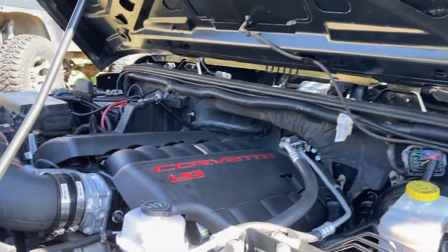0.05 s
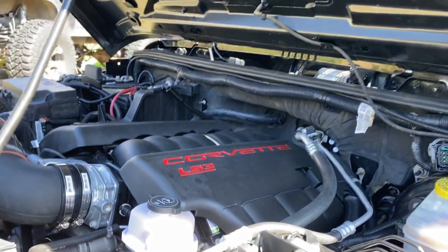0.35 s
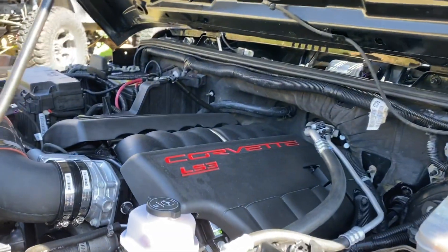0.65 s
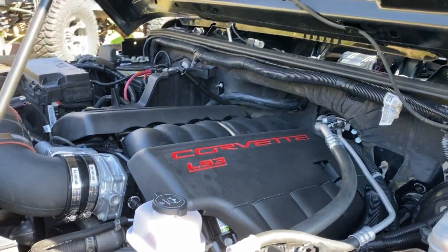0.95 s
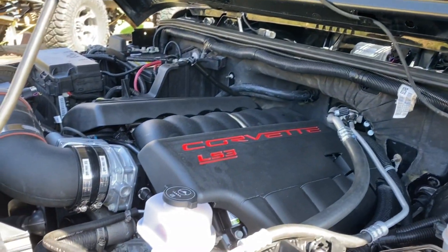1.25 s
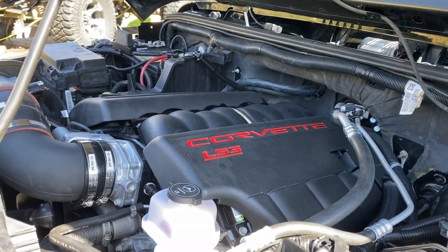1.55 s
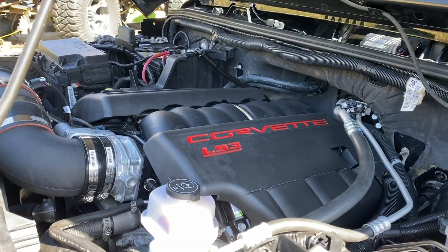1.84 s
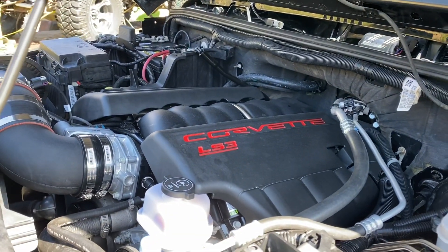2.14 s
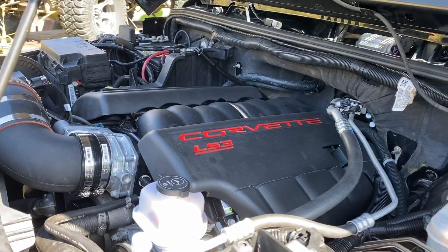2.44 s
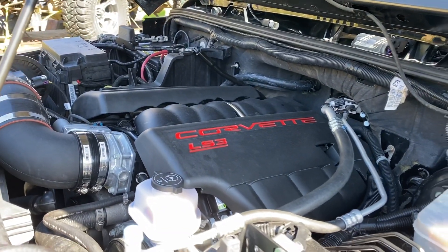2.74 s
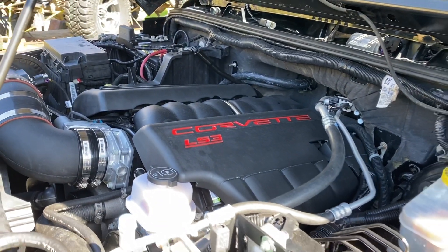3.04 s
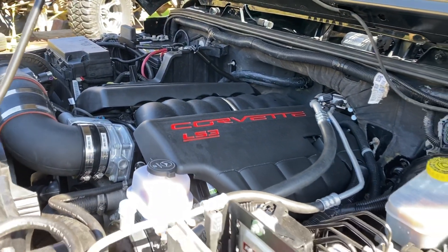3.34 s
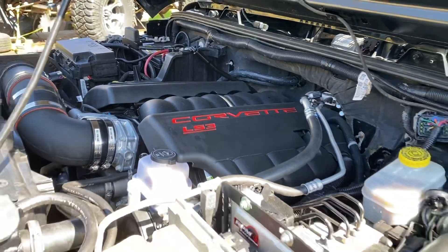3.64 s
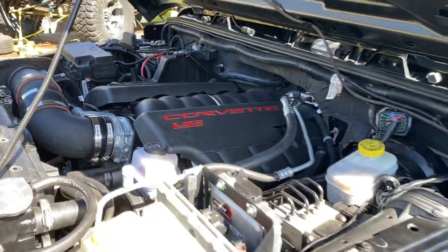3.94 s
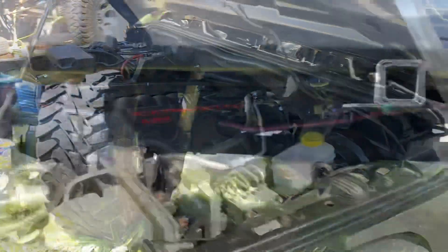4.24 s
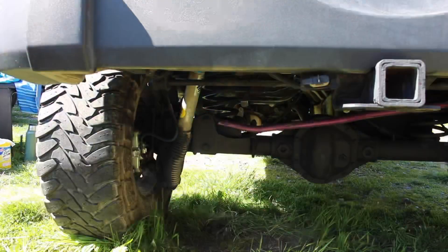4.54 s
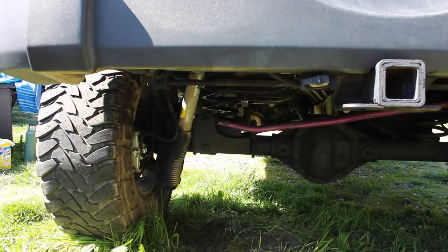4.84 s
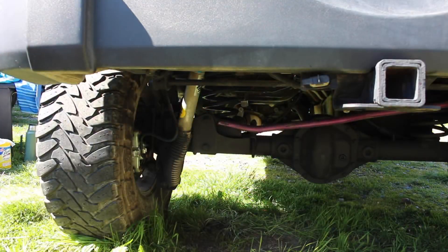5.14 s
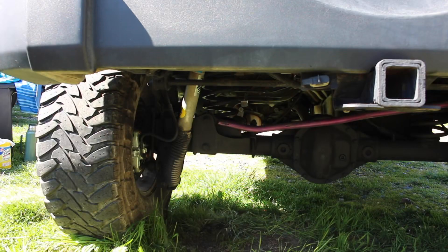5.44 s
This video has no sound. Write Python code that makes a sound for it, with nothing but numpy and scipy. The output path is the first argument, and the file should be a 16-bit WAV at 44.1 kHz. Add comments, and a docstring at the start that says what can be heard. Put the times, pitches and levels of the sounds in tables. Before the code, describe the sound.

Close above an open engine bay, a V8 throbs at idle with ticking valves and a hissing belt. It revs lightly once, the intake droning, then gradually winds down. A sharp click cuts to a spot near the tailpipe: low, raspy, ringing exhaust puffs with muffled clatter underneath. The idle recovers from a brief dip and picks up with another touch of throttle.

```python
"""A cross-plane V8 idles with a lope, the beat of its unequal firing pulses, which evens out under throttle
and softens on the overrun. Over the open engine bay a touch of throttle lifts it and it sinks back: the
intake drones and barks, valve gear clatters, panels sing as the speed passes their pitch, and the belt
drive hisses and whines. With a click the scene changes to behind the tailpipe, where gas rasps and rings
over dull machinery as the engine recovers from a dip and is lifted again."""
import sys
import numpy as np
from scipy import signal
from scipy.fft import rfft, irfft
from scipy.io import wavfile
from scipy.ndimage import uniform_filter1d

SR = 44100
rng = np.random.default_rng(int(sys.argv[2]) if len(sys.argv) > 2 else 0)


def transcribe(u):
    """Save the signal u as a 16-bit wav file named by the first command-line argument.

    u: samples, shape (n,) or (channels, n), limited to [-1, 1]; the rate is SR.
    q: integer samples, one column per channel.
    """
    v = np.clip(np.atleast_2d(u).T, -1, 1)
    q = np.round(v * 32767).astype(np.int16)
    wavfile.write(sys.argv[1], SR, q)


N = 250929
TIME = np.arange(N) / SR
FREQ = np.maximum(np.arange(N // 2 + 1) * SR / N, 1)
CYLINDERS, MAX_CYCLES = 8, 160

# Exhaust pulses in firing order: (relative strength [dB])
FIRING_PULSES = [-1.2, -.6, -.9, .1, -.5, -1.9, -.6, 2.2]
def exhaust(cycles, orders, loads, pipe, phase, dispersion, waver_db):
    """Fourier series: periodic firing gives orders, harmonics of the cycle rate, weighted by the pipes."""
    pattern = np.fft.fft(undb(FIRING_PULSES))
    cycle_hz = np.gradient(cycles) * SR
    pipe_gain = shape(pipe)
    note = 0
    for order, idle_db, *load_db in orders:
        k = round(order)
        lead = np.angle(pattern[k % CYLINDERS])  # strong and weak cylinders set each order's phase
        # the pipes delay the higher orders, which rounds off each pulse
        wave = np.cos(2 * np.pi * k * cycles + lead + phase - dispersion * k ** 2)
        db = idle_db + np.dot(load_db, loads) + waver_db * np.sqrt(k / CYLINDERS) * walk(14)
        note = note + np.sqrt(2) * undb(db) * np.interp(k * cycle_hz, FREQ, pipe_gain) * wave
    return note


def rumble(cycles, spectrum):
    """Cyclic variation: no two burns are equal, and their random part excites the pipes as low noise."""
    sizes = rng.standard_normal((MAX_CYCLES, CYLINDERS))
    burns = impulses(cycles, np.arange(CYLINDERS) / CYLINDERS, sizes, late_s=0)
    return unit(colour(burns, shape(spectrum)))


# Exhaust harmonics: (order [per cycle], idle level [dB], gain [dB/throttle], gain [dB/overrun])
BAY_HARMONICS = [(3.0, -18.5, -15, -4), (4.0, -47, -1, 10), (5.0, -26, -1, -13.5), (6.0, -25.5, -8.5, -11),
                 (7.0, -55, 29.5, -13), (8.0, -22.5, 6.5, -12), (9.0, -37, 12, 2), (10.0, -30.5, -1.5, -26),
                 (11.0, -25, -3.5, -17.5), (12.0, -38.5, 7, -5), (13.0, -30, -3, -14.5),
                 (16.0, -27.5, -9, -18)]
# Response of pipes and muffler: (frequency [Hz], gain [dB])
BAY_PIPE_GAIN = [(42.0, -7), (51.0, -1.5), (62.0, 7), (85.0, 0.5), (103.0, 8), (118.0, 13), (142.0, -1),
                 (160.0, -4), (180.0, -8.5), (210.0, 5), (245.0, -7.5), (290.0, 3), (335.0, -4.5),
                 (360.0, 2), (420.0, -7)]
# Rumble of unequal burns: (frequency [Hz], gain [dB])
BAY_RUMBLE = [(20, -36), (36, -29), (50, 0), (75, 9), (120, 3), (170, -47), (260, -36), (500, -48)]
def bay_lope(cycles, throttle, overrun):
    """Superposition: the exhaust's periodic note and random rumble add beneath the bay."""
    note = exhaust(cycles - .206, BAY_HARMONICS, [throttle, overrun], BAY_PIPE_GAIN,  # lag in the pipes
                   phase=.61, dispersion=.664, waver_db=.85)
    return note + undb(-25 - 2 * throttle - 6.5 * overrun) * rumble(cycles, BAY_RUMBLE)


# Exhaust harmonics: (order [per cycle], idle level [dB], gain [dB/load])
REAR_HARMONICS = [(3.0, -29.5, -5), (4.0, -27.5, -15), (5.0, -29.5, 3), (6.0, -22, -3), (7.0, -59, 20),
                  (8.0, -19, 8), (9.0, -51, -1), (10.0, -37, -8), (11.0, -24.5, -3.5), (13.0, -28, 2.5),
                  (15.0, -34.5, -2), (16.0, -34.5, 6), (19.0, -37.5, 5), (21.0, -31, -1), (24.0, -54, 5),
                  (27.0, -45.5, 6), (44.0, -42, -1)]
# Response of pipes and muffler: (frequency [Hz], gain [dB])
REAR_PIPE_GAIN = [(40.0, -17), (51.0, 7.5), (65.0, -6), (105.0, 1), (140.0, 2.5), (165.0, -5), (205.0, 0),
                  (280.0, -5.5), (400.0, -10.5), (450.0, -1), (495.0, 4.5), (550.0, 0.5), (650.0, -18),
                  (748, -10.5), (830, -22)]
# Rumble of unequal burns: (frequency [Hz], gain [dB])
OUTLET_RUMBLE = [(20, -41), (38, -32), (55, -14), (80, 6), (125, 19), (170, 11.5), (260, -21), (500, -51)]
def rear_lope(cycles, load):
    """Radiation from an open pipe: the exhaust's note and rumble, close to the outlet."""
    note = exhaust(cycles - .052, REAR_HARMONICS, [load], REAR_PIPE_GAIN,  # lag in the pipes
                   phase=.76, dispersion=.136, waver_db=.5)
    return note + undb(-26) * rumble(cycles, OUTLET_RUMBLE)


# Spectrum of the rasp: (frequency [Hz], gain [dB])
RASP_SPECTRUM = [(25, -40), (70, -9), (150, -5), (220, 2), (270, -1), (340, 1), (405, -7.5), (492, 0.5),
                 (545, -4.5), (590, -1), (650, -22), (760, -12), (880, -19), (2000, -45.5)]
def tailpipe_rasp(cycles, load, cycle_hz):
    """Source and filter: bursts of gas, stronger with load and speed, are coloured by the tailpipe."""
    idle_hz = 17
    gas = impact_train(cycles, jitter_s=.00012, scatter_db=.5, throb_db=2.2, t60=.033)
    db = -28.5 + 3 * load + 5 * np.log2(cycle_hz / idle_hz)
    return undb(db) * unit(colour(gas, shape(RASP_SPECTRUM)))


# Strong puffs: (position [cycles], frequency [Hz], t60 [s], relative level [dB])
PUFF_MODES = [(0.96, 494, 0.14, -1.5), (.58, 495, .08, -7), (.1, 748, .2, -14)]
def tailpipe_puffs(cycles, load):
    """Shock excitation: strong puffs ring the pipe, and fade as load evens out the firings."""
    return undb(-32 - 11 * load) * ring(cycles, PUFF_MODES, scatter_db=.3, jitter_s=.00012, rise_s=.0033)


def intake_drone(cycles, throttle):
    """Forced resonance: suction strokes drive the duct, whose peak grows and broadens with throttle."""
    duct_hz, half_width_hz = 156.5, 5.7 + 24 * throttle ** 2
    strokes = CYLINDERS * (cycles - .039)
    response = resonance(np.gradient(strokes) * SR, duct_hz, 2 * half_width_hz)
    db = -26 + 1.5 * throttle + .7 * walk(12)
    return np.sqrt(2) * undb(db) * response * np.cos(2 * np.pi * strokes)


# Spectrum of the bark: (frequency [Hz], gain [dB])
BARK_SPECTRUM = [(90, -30), (170, -5), (230, 2), (350, -2), (410, -8), (470, 11.5), (540, 7), (640, -5),
                 (800, -11), (1000, -9), (1200, -6), (1700, -22), (4000, -40)]
def intake_bark(cycles, load):
    """Modulated flow noise: air tears past the open throttle in one gulp for each cylinder."""
    gulps = undb(5.5 * np.cos(2 * np.pi * CYLINDERS * cycles) + .5 * walk(130))
    air = unit(colour(gulps * rng.standard_normal(N), shape(BARK_SPECTRUM)))
    return undb(-22.5 + 17 * (load - 1)) * air


# Response of the casings: (frequency [Hz], gain [dB])
CASING_GAIN = [(40, -9.5), (150, 6.5), (260, -5.5), (315, -5), (410, -7.5), (620, -2.5), (780, 0),
               (900, -1.5), (1080, -1), (1550, -6.5), (1950, -4), (2350, -5.5), (2700, -8.5), (3200, -8.5),
               (4600, -12.5), (6500, -19), (15000, -28)]
# Their resonances: (frequency [Hz], width [Hz], gain [dB])
CASING_MODES = [(480, 76, 5.1), (810, 90, 2.8), (1196, 74, 4.2), (1385, 24, 3.6), (1855, 72, 2),
                (2230, 49, 1.8), (2920, 100, 2), (5300, 230, 4.5)]
# Scattering by the bay's walls into the side signal: (frequency [Hz], gain [dB])
WALL_GAIN = [(50, -2.5), (250, -2.5), (500, -6.5), (1000, -6.5), (2000, -3.5), (3000, 0), (4500, -3.5),
             (6000, -3.5), (12000, 4.5)]
def valve_clatter(cycles):
    """Structure-borne sound: valves, lifters and pistons ring the casings. Returns direct and scattered."""
    casings = shape(CASING_GAIN, CASING_MODES)
    strikes = impact_train(cycles, jitter_s=.0001, scatter_db=3, throb_db=-1.2, t60=.029)
    direct = radiate(strikes, casings, noise_db=-6)
    side_strikes = impact_train(cycles, jitter_s=.0001, scatter_db=.5, throb_db=-2.5, t60=.057)
    sideways = radiate(side_strikes, casings, noise_db=-6.5)
    return direct, colour(sideways, shape(WALL_GAIN))


# Panels and pipes: (order [per cycle], resonance [Hz], width [Hz], relative level [dB])
PANEL_MODES = [(10, 200, 18, -16), (11, 201, 14, -7), (12, 285, 56, -10), (18, 365, 36, -16),
               (19, 356, 36, -12), (20, 360, 30, -12), (19, 465, 40, -18), (27, 605, 70, -14),
               (30, 730, 70, -12), (32, 755, 130, -13), (33, 610, 60, -15), (41, 820, 120, -16),
               (44, 900, 160, -17), (51, 945, 90, -15), (48, 1172, 90, -16), (59, 1190, 80, -17),
               (55, 1230, 90, -17), (75, 1275, 50, -18), (74, 1807, 60, -20), (106, 1803, 70, -22),
               (102, 1905, 120, -16), (132, 2245, 120, -13), (137, 2330, 90, -17), (57, 1385, 60, -20),
               (124, 2560, 200, -21), (132, 3190, 90, -22), (220, 3735, 280, -18), (311, 5265, 200, -27)]
def singing_panels(cycles):
    """Forced resonance: a part sings while an order of teeth, vanes or strokes meets its frequency."""
    cycle_hz = np.gradient(cycles) * SR
    out = 0
    for order, centre_hz, width_hz, db in PANEL_MODES:
        response = resonance(order * cycle_hz, centre_hz, width_hz)
        wave = np.sin(2 * np.pi * (order * cycles + rng.random()) + .03 * np.sqrt(order) * walk(30))
        out = out + np.sqrt(2) * undb(db + 2 * walk(29.83)) * response * wave
    return out


# Knocks and tappet ticks: (position [cycles], frequency [Hz], t60 [s], relative level [dB])
TAPPET_MODES = [(.34, 812, 0.13, 4.5), (.22, 870, .08, -10), (0.1, 2500, 0.05, -13)]
# Their envelope: (time [s], level [dB])
TAPPET_LEVEL = [(0, -42), (.25, -35), (.42, -31.5), (.78, -32), (.95, -42), (1.2, -50), (2.5, -50),
                (4.3, -60)]
def tappet_knocks(cycles):
    """Impact excitation: knocks recur in every cycle, plainest at a slack idle."""
    knocks = ring(cycles, TAPPET_MODES, scatter_db=0, jitter_s=.00008, rise_s=.0032)
    return undb(curves(TAPPET_LEVEL)[0]) * knocks


# Machinery through the floor: (frequency [Hz], gain [dB])
FLOOR_GAIN = [(30, -16), (400, 3.5), (900, -4.5), (1050, 1.5), (1130, 5.5), (1190, 0), (1255, 3),
              (1500, -2), (1800, 0), (2150, -2), (2600, -5.5), (4000, -13.5), (5600, -17.5), (6500, -22.5),
              (8500, -21.5), (10200, -30.5), (12800, -34), (15700, -44)]
# Its tick: (position [cycles], frequency [Hz], t60 [s], relative level [dB])
FLOOR_TICK = [(.52, 2150, .012, -17)]
def underfloor_clatter(cycles):
    """Transmission loss: clatter arrives dulled from under the floor, with one faint tick a cycle."""
    strikes = impact_train(cycles, jitter_s=.00006, scatter_db=1, throb_db=.2, t60=.035)
    clatter = radiate(strikes, shape(FLOOR_GAIN), noise_db=-8)
    return clatter + ring(cycles, FLOOR_TICK, scatter_db=4, jitter_s=.00023, rise_s=.00025)


# Spectrum of the hiss: (frequency [Hz], gain [dB])
HISS_SPECTRUM = [(1500, -37), (4000, -19), (6200, 2.5), (7500, -2), (10000, 7.5), (12000, -4), (14000, 8),
                 (15700, -8.5)]
def belt_hiss(ticks):
    """Interaural delay: the belt drive's hiss reaches the left ear later, so it lies to the right."""
    delay_s = .000283
    right = radiate(ticks, shape(HISS_SPECTRUM), noise_db=2)
    left = colour(right, np.exp(-2j * np.pi * FREQ * delay_s))
    return np.array([left, right])


# Response of the intake box: (frequency [Hz], gain [dB])
AIRBOX_GAIN = [(200, -37), (310, -14.5), (355, -1), (400, -11.5), (600, -53)]
# Envelope of its boom: (time [s], level [dB])
BOOM_LEVEL = [(0, -39), (1.2, -35), (1.7, -38), (2.6, -51), (2.95, -46), (3.7, -44), (4.3, -45)]
def airbox_boom(ticks):
    """Cavity resonance: the intake box booms at one pitch whatever the engine speed."""
    return undb(curves(BOOM_LEVEL)[0]) * radiate(ticks, shape(AIRBOX_GAIN), noise_db=-3)


# Rotor harmonics: (time [s], sixth [dB], seventh [dB], eighth [dB])
ROTOR_LEVELS = [(1.3, -60, -60, -60), (1.5, -43.5, -56, -58), (1.75, -43.5, -56, -58), (1.9, -54, -58, -60),
                (2.25, -45, -44, -50), (2.42, -55, -47, -53), (2.52, -58, -46, -41), (2.65, -53, -54, -50),
                (2.78, -44, -56, -45), (2.89, -53, -48, -47), (2.99, -60, -52, -38),
                (3.16, -60, -54, -44.5), (3.3, -58, -56, -41.5), (3.42, -50, -60, -53),
                (3.6, -45, -62, -64), (3.9, -60, -66, -68)]
def rotor_whine(cycles):
    """Phase modulation: three harmonics of a belt-driven rotor flutter as the belt creeps."""
    turns = 24.8 * cycles
    out = 0
    for k, db in zip((6, 7, 8), curves(ROTOR_LEVELS)):
        amplitude = np.sqrt(2) * undb(db + 2.2 * walk(45))
        out = out + amplitude * np.sin(2 * np.pi * k * turns + .45 * walk(58))
    return out


def impact_train(cycles, jitter_s, scatter_db, throb_db, t60, count=96):
    """Quasi-periodic excitation: blows recur nearly alike each cycle, spread by dense reflections."""
    positions = (np.arange(count) + rng.random(count)) / count
    strengths = rng.choice([-1, 1], count) * undb(2 * rng.standard_normal(count))
    throb = undb(throb_db * (np.cos(2 * np.pi * 3 * positions) + np.sin(2 * np.pi * 2 * positions)))
    scatter, jitter = rng.standard_normal((2, MAX_CYCLES, count))
    sizes = strengths * throb * undb(scatter_db * scatter)
    hits = unit(impulses(cycles, positions, sizes, jitter_s * jitter))
    echoes = rfft(rng.standard_normal(N) * np.exp(-np.log(1000) * TIME / t60))
    return colour(hits, np.exp(1j * np.angle(echoes)))  # all-pass: spreads without colouring


def ring(cycles, modes, scatter_db, jitter_s, rise_s):
    """Damped free vibration: each mode is struck once a cycle and decays exponentially."""
    out = 0
    for position, hz, t60, db in modes:
        scatter, jitter = rng.standard_normal((2, MAX_CYCLES, 1))
        hits = impulses(cycles, position, undb(scatter_db * scatter), jitter_s * jitter)
        envelope = np.exp(-np.log(1000) * TIME / t60) * (1 - np.exp(-TIME / rise_s))
        response = envelope * np.sin(2 * np.pi * hz * TIME)
        out = out + undb(db) * unit(colour(hits, rfft(response)))
    return out


def impulses(cycles, positions, sizes, late_s):
    """Impulse train locked to positions in the cycle; sizes has one row per cycle."""
    when = np.interp(np.arange(len(sizes))[:, None] + positions, cycles, TIME, left=-1, right=-1)
    at = np.round((when + late_s) * SR).astype(int)
    inside = (at >= 0) & (at < N)
    return np.bincount(at[inside], sizes[inside], N)


def radiate(hits, gain, noise_db):
    """Source and filter: blows plus white noise, coloured and scaled to rms 1."""
    return unit(colour(hits + undb(noise_db) * rng.standard_normal(N), gain))


def resonance(hz, centre_hz, width_hz):
    """Lorentzian peak of height 1, with its full width at half height."""
    return 1 / (1 + (2 * (hz - centre_hz) / width_hz) ** 2)


def shape(points, modes=()):
    """Frequency response from (frequency [Hz], gain [dB]) points and resonance peaks."""
    hz, db = np.transpose(points)
    peaks_db = sum(peak_db * resonance(FREQ, centre, width) for centre, width, peak_db in modes)
    return undb(np.interp(np.log(FREQ), np.log(hz), db) + peaks_db)


def colour(x, gain):
    """Filtering as multiplication of the spectrum."""
    return irfft(rfft(x) * gain, N)


def walk(rate_hz):
    """Low-pass noise: random steps, smoothed twice."""
    hold = int(SR / rate_hz)
    steps = np.repeat(rng.standard_normal(N // hold + 1), hold)
    return unit(uniform_filter1d(uniform_filter1d(steps, hold), hold)[:N])


def curves(table):
    """Linear interpolation of each column in time."""
    times, *columns = np.transpose(table)
    return [np.interp(TIME, times, column) for column in columns]


def undb(db):
    """Decibels to amplitude ratio."""
    return 10 ** (np.asarray(db) / 20)


def unit(x):
    """Normalisation to rms 1."""
    return x / np.sqrt(np.mean(x ** 2))


# Engine speed: (time [s], four-stroke cycle rate [Hz])
BAY_RATE = [(0, 14.32), (0.23, 16.19), (0.52, 17.03), (0.98, 16.73), (1.14, 18.03), (1.33, 22.99),
            (1.47, 24.37), (1.7, 24.44), (2.2, 23.59), (2.85, 20.99), (3.5, 19.22), (4.3, 17.3)]
# Engine load: (time [s], load [1 on throttle, 0 idling, -1 on the overrun])
BAY_ENGINE_LOAD = [(0.0, 0.2), (0.25, 0.018), (1.0, 0.17), (1.18, 0.79), (1.33, 0.91), (1.6, -0.47),
                   (2.2, -0.88), (2.9, -1.05), (3.4, -1.35), (4.3, -0.61)]
# Envelope of the machinery: (time [s], level [dB])
BAY_MACHINERY = [(0, -23), (.3, -21), (1, -21), (1.2, -19), (1.6, -18.5), (1.8, -22), (2.7, -23.5),
                 (3.6, -27), (4.3, -30)]
def engine_bay():
    """Superposition over the bay: one crankshaft times every source; wall scatter gives stereo width."""
    cycles = .1375 + np.cumsum(curves(BAY_RATE)[0]) / SR
    load, machinery_db = curves(BAY_ENGINE_LOAD)[0], curves(BAY_MACHINERY)[0]
    throttle, overrun = np.maximum(load, 0), np.maximum(-load, 0)
    lope = bay_lope(cycles, throttle, overrun)
    direct, side = valve_clatter(cycles)
    mid = direct + singing_panels(cycles)
    metal = undb(machinery_db) * np.array([undb(.64) * (mid + side), undb(-.64) * (mid - side)])
    ticks = impact_train(cycles, jitter_s=.0003, scatter_db=6, throb_db=1.5, t60=.036)
    belt = undb(machinery_db - 11.5) * belt_hiss(ticks) + rotor_whine(cycles)
    knocks = tappet_knocks(cycles)
    intake = airbox_boom(ticks) + intake_drone(cycles, throttle) + intake_bark(cycles, load)
    return lope + intake + metal + knocks + belt


# Engine speed: (time [s], four-stroke cycle rate [Hz])
REAR_RATE = [(4.3, 13.14), (4.48, 15.54), (4.88, 17.12), (5.36, 16.72), (5.51, 18.65), (5.69, 22.8)]
# Engine load: (time [s], load [1 on throttle, 0 idling])
REAR_ENGINE_LOAD = [(4.3, 1), (4.5, 0.24), (4.6, -0.0037), (5.0, -0.08), (5.3, 0.048), (5.5, 1.2),
                    (5.7, 0.72)]
# Envelope of the machinery: (time [s], level [dB])
REAR_MACHINERY = [(4.3, -38.5), (4.6, -36), (4.75, -32.5), (5.3, -30), (5.5, -34.5), (5.6, -37),
                  (5.63, -34.5), (5.69, -33.5)]
def behind_car():
    """Superposition behind the car: tailpipe and machinery lie straight ahead, alike in both ears."""
    cycle_hz, load = curves(REAR_RATE)[0], curves(REAR_ENGINE_LOAD)[0]
    cycles = .94 + np.cumsum(cycle_hz) / SR
    lope = rear_lope(cycles, load)
    rasp = tailpipe_rasp(cycles, load, cycle_hz)
    machinery = undb(curves(REAR_MACHINERY)[0]) * underfloor_clatter(cycles)
    return lope + rasp + tailpipe_puffs(cycles, load) + machinery


def scene():
    """Two listening points in turn: the bay gives way abruptly to the rear, with a click."""
    change_s, fade_s, click_decay_s = 4.301, .0017, .0004
    rear = np.clip((TIME - change_s) / fade_s, 0, 1)
    click = undb(-9.5) * (TIME > change_s) * np.exp(-np.abs(TIME - change_s) / click_decay_s)
    return (1 - rear) * engine_bay() + rear * behind_car() + click


def record(dry):
    """Band limiting: a steep elliptic low-pass removes the highest treble."""
    cutoff_hz = 15700
    return signal.sosfilt(signal.ellip(10, .1, 90, cutoff_hz, fs=SR, output="sos"), dry)


dry = scene()
out = record(dry)
transcribe(out)
```